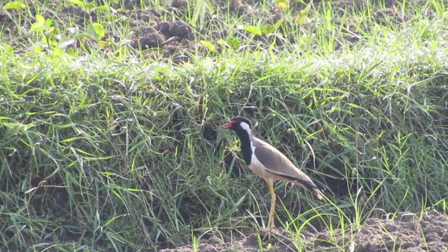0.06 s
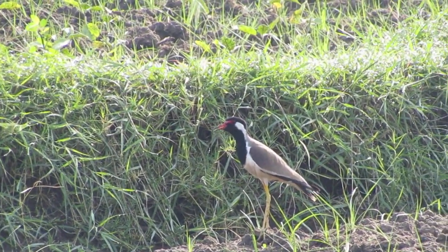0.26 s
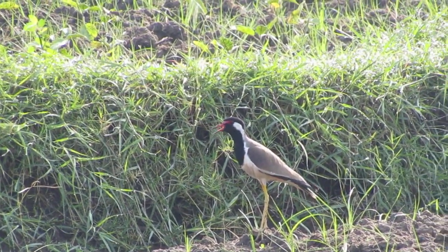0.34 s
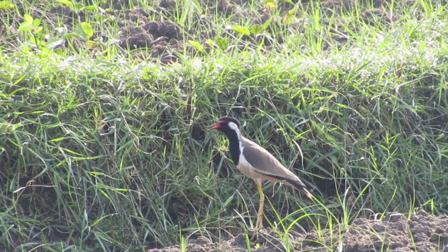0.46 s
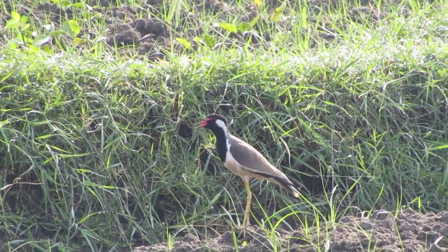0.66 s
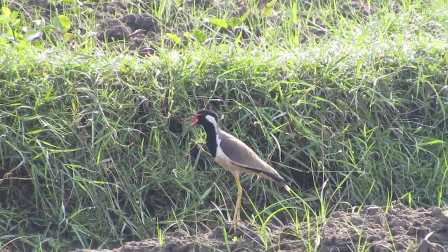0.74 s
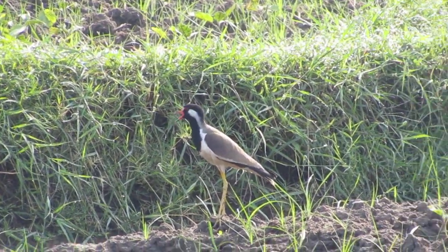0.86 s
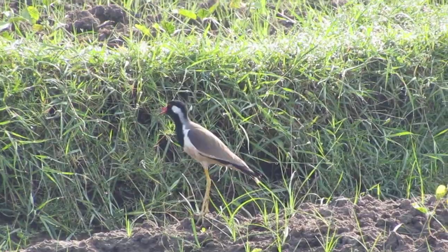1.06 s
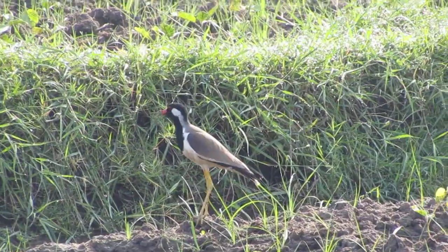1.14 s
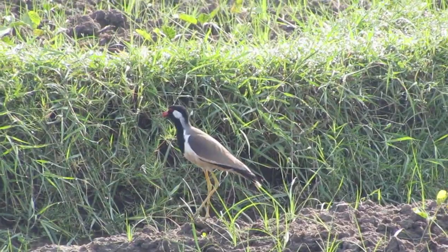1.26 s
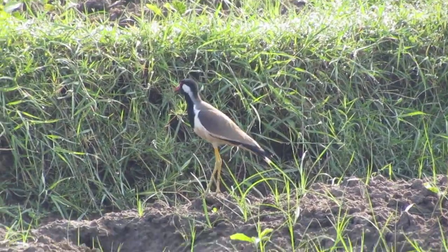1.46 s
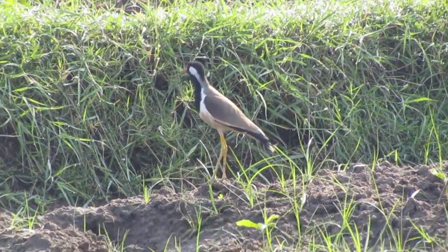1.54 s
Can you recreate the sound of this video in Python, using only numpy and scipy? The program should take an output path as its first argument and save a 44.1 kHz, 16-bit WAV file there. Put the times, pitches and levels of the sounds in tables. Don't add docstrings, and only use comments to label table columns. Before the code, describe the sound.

A lapwing calls sharply a few metres away over steady soft field hiss, low rumble and distant twittering. Bright, nasal notes come at 0.34 and 0.5 seconds, a stutter at 0.73, four quick bursts at 0.85, and a longer falling stutter from 0.99 to 1.11. A farther wader answers immediately, low then high. Twitter continues; near 1.58 grass rustles faintly and another bird pipes. Short outdoor echoes.

```python
import sys
import numpy as np
from scipy import signal
from scipy.fft import rfft, irfft
from scipy.io import wavfile

SR = 44100
rng = np.random.default_rng(int(sys.argv[2]) if len(sys.argv) > 2 else 0)


def ratio_of_db(decibels):
    return 10 ** (np.asarray(decibels, float) / 20)


def persist_wave(psi):
    counts = np.round(np.clip(psi, -1, 1) * 32767).astype(np.int16)
    wavfile.write(sys.argv[1], SR, np.atleast_2d(counts).T)


N = 70560


def at_hz(points, hz):
    table_hz, table_db = np.transpose(points)
    return np.interp(np.log(hz), np.log(table_hz), table_db)


def rms_one(x):
    return x / np.sqrt(np.mean(x ** 2) + 1e-20)


def band(hz, width_hz):
    sos = signal.butter(2, [hz - width_hz / 2, hz + width_hz / 2], "band", fs=SR, output="sos")
    settled = signal.sosfilt(sos, rng.standard_normal(N + SR))[SR:]
    return rms_one(settled)


def gate(start, length, attack, release):
    t = np.arange(N) / SR
    ramp = np.minimum((t - start) / attack, (start + length - t) / release)
    return np.sin(np.pi / 2 * np.clip(ramp, 0, 1)) ** 2


def arch(start, length, first_hz, mid_hz, last_hz):
    u = np.clip((np.arange(N) / SR - start) / length, 0, 1)
    return first_hz * (1 - u) * (1 - 2 * u) + mid_hz * 4 * u * (1 - u) + last_hz * u * (2 * u - 1)


def stack(f0, throat, tilt_db, count, top_db=0, low_db=0):
    phase = 2 * np.pi * np.cumsum(f0) / SR
    out, power = 0, 0
    for k in range(1, count + 1):
        beak_db = tilt_db * np.log2(np.clip(k, 2, 5) / 2)
        gain = ratio_of_db(at_hz(throat, k * f0) + beak_db + top_db * (k > 6) + low_db * (k < 4))
        lag = 0.33 * np.clip(k - 2, 0, 4) ** 2
        out = out + gain * np.sin(k * phase - lag)
        power = power + gain ** 2 / 2
    return out / np.sqrt(power)


def lapwing():
    # start_s, length_s, level_db, swell_db (to the end), beak_db_per_octave
    bursts = [(.3415, .0305, -29, 1.5, -1), (.3695, .0135, -37, -5, -12), (.4982, .0235, -30.5, 1, 1.5),
              (.520, .008, -42, -3, -9), (.7265, .008, -34, -1.5, .5), (.740, .022, -32.5, .5, 1),
              (.7595, .009, -38, -3, -4), (.8517, .0105, -32, -2.5, 2), (.8655, .0115, -30, -1, 2.5),
              (.8802, .015, -30.5, -3, 2.5), (.8935, .0215, -31, 1, 1.5), (.992, .008, -35.5, -2, -1.5),
              (1.0042, .011, -33.5, -1.5, -1.5), (1.0182, .012, -33.5, -2, -2.5),
              (1.0315, .012, -34.5, -1.5, -2.5), (1.0452, .014, -35.5, -2, -4.5),
              (1.0578, .033, -37, .5, -17), (1.0885, .024, -41.5, -5, -26)]
    # time_s, pitch_hz
    calls = [
        [(.341, 1245), (.352, 1278), (.360, 1268), (.366, 1258), (.370, 1225), (.375, 1140), (.383, 1150)],
        [(.498, 1205), (.507, 1235), (.517, 1228), (.526, 1160)],
        [(.726, 1165), (.734, 1160), (.740, 1205), (.746, 1208), (.758, 1182), (.768, 1110)],
        [(.852, 1190), (.870, 1215), (.890, 1228), (.906, 1240), (.915, 1215)],
        [(.992, 1215), (1.008, 1248), (1.024, 1248), (1.050, 1222), (1.064, 1192), (1.084, 1165), (1.097, 1125),
         (1.101, 1050), (1.111, 1015)],
    ]
    # frequency_hz, level_db
    throat = [(1250, -24), (2500, -4), (3750, -4), (5000, 1.5), (6250, -4.5), (7500, -13.5), (10000, -29),
              (12000, -24), (15000, -34)]
    attack_s, release_s = .0015, .003
    scoop_hz, scoop_s = 25, .002
    droop_hz, droop_s = 90, .002
    opening_db, thinning_db = 7, -6
    edge_rasp_db, rasp_db = -8, -20.5

    t, out = np.arange(N) / SR, 0
    line = np.interp(t, *np.transpose(sum(calls, [])))
    line = line * (1 + .0035 * band(260, 490))
    flap = ratio_of_db(edge_rasp_db) * band(570, 780)
    for start, length, db, swell_db, tilt_db in bursts:
        u = np.clip((t - start) / length, 0, 1)
        opened = gate(start, length, attack_s, release_s)
        bright = tilt_db > -8
        scoop = scoop_hz * np.exp(-u * length / scoop_s)
        droop = droop_hz * bright * np.exp(-(1 - u) * length / droop_s)
        voice = stack(line - scoop - droop, throat, tilt_db, count=12,
                      top_db=opening_db * (u - .5), low_db=thinning_db * (u - .5) * bright)
        level = ratio_of_db(db + swell_db * (2 * u - 0.5))
        out = out + level * opened * (1 + flap * (1 - opened)) * voice
    return out * (1 + ratio_of_db(rasp_db) * band(590, 1170))


def far_waders():
    # start_s, length_s, level_db, first_hz, mid_hz, last_hz
    registers = [
        [(1.109, 0.0394, -48.5, 682, 690, 720), (1.148, 0.0147, -42.5, 962, 1000, 1030)],
        [(1.165, 0.0178, -41.5, 1490, 1520, 1656), (1.179, .017, -39.5, 1630, 1650, 1590)],
        [(1.591, 0.014, -45.5, 1310, 1350, 1320)],
    ]
    # frequency_hz, level_db
    throats = [
        [(1000, -18), (2000, 0.5), (2800, -2), (3400, -18), (4000, -13), (6000, -25)],
        [(1600, -10), (3100, -3.5), (4500, -11), (4950, 0.5), (6100, -33), (6600, -11.5), (7500, -34)],
        [(1300, -23), (2700, -20), (4000, -11), (5300, -17), (7000, -23), (9000, -31)],
    ]
    out = 0
    for notes, throat in zip(registers, throats):
        for start, length, db, *hz in notes:
            voice = stack(arch(start, length, *hz), throat, 0, count=8)
            out = out + ratio_of_db(db) * gate(start, length, 0.001, 0.0018) * voice
    return out


def whistlers():
    # start_s, length_s, level_db, first_hz, mid_hz, last_hz
    whistles = [(.2195, .003, -51, 3500, 2900, 2300), (.227, .023, -43, 2900, 3170, 2980),
                (.249, .013, -49, 3350, 3600, 3700), (.261, .019, -56, 3620, 3550, 3560),
                (.282, .05, -63, 3560, 3520, 3500), (.285, .006, -56, 3000, 2900, 2800),
                (.283, .034, -51, 900, 940, 945), (1.184, .036, -51, 900, 960, 950),
                (.580, .146, -56, 3380, 3590, 3420), (1.156, .012, -51, 2500, 2750, 2900),
                (1.188, .011, -50, 3250, 3050, 2950), (1.298, .016, -58, 5300, 4100, 3600),
                (1.226, .014, -61, 3300, 3600, 4000), (1.535, .018, -62, 4400, 3800, 3650),
                (1.553, .022, -59, 3750, 3900, 3900), (1.574, .012, -61, 3300, 3800, 4100),
                (.47, .07, -62, 1490, 1500, 1490), (1.160, .010, -48, 2250, 2000, 1750),
                (1.140, .013, -50, 2050, 2150, 2250), (-.02, .058, -59, 3280, 3200, 3020),
                (-.02, .05, -56, 1690, 1670, 1600)]
    waver = 1 + 0.018 * band(148, 249)
    throb = np.abs(1 + .45 * band(170, 170))
    flutter = ratio_of_db(1.5 * band(40, 50))
    out = 0
    for start, length, db, *hz in whistles:
        short = length < .03
        edge_s = min(0.1 * length, .012)
        pitch = arch(start, length, *hz) * (waver if short else 1)
        tone = np.sin(2 * np.pi * np.cumsum(pitch) / SR)
        unsteady = throb if short else flutter * throb ** .5
        out = out + ratio_of_db(db + 1.5) * gate(start, length, edge_s, edge_s) * tone * unsteady
    return out


def flock():
    # time_s, level_db, centre_hz
    twitter = [(0, -61.5, 5470), (.07, -54.5, 5706), (.15, -65, 6270), (.25, -54, 5720), (.32, -57, 6440),
               (.45, -55, 6000), (.62, -53, 5740), (.72, -62, 5700), (.82, -65, 5600), (.96, -54.5, 6310),
               (1.12, -58.5, 5860), (1.26, -52.5, 5770), (1.34, -60.5, 6070), (1.43, -54.5, 5740),
               (1.49, -63.5, 5900), (1.529, -57, 6480), (1.6, -48.5, 5620)]
    chirps_per_s, chirp_s = 130, .013
    fall_hz, spread_hz = 750, 300
    s, db, hz = np.transpose(twitter)
    out, draws = np.zeros(N + SR), rng.standard_normal((300, 3))
    t = np.arange(int(chirp_s * SR)) / SR
    for k, (late, off, loud) in enumerate(draws):
        start = (k + 0.24 * late) / chirps_per_s
        if 0 < start < N / SR:
            f = np.interp(start, s, hz) + spread_hz * off + fall_hz * (.5 - t / chirp_s)
            chirp = np.hanning(len(t)) * np.sin(2 * np.pi * np.cumsum(f) / SR)
            i = int(start * SR)
            out[i:i + len(t)] += ratio_of_db(np.interp(start, s, db) + 1.85 * loud) * chirp
    haze = ratio_of_db(-7 + np.interp(np.arange(N) / SR, s, db)) * band(6000, 1100)
    return ratio_of_db(-3) * out[:N] + haze


def echoes(x):
    # start_s, t60_s, level_db, echoes_per_s
    scatter = [
        (.003, .11, -8, 2500),
        (.02, .4, -19, 2000),
    ]
    # delay_s, level_db
    walls = [(.0042, -17), (.0115, -17), (.021, -15)]
    # frequency_hz, level_db
    echo_colour = [(1000, -5), (2500, -2.5), (5000, -1.5), (7000, 0.5), (9000, 10), (15000, 5)]
    t, response = np.arange(SR // 2) / SR, 0
    for start, t60, db, rate in scatter:
        struck = rng.standard_normal(len(t)) * (rng.random(len(t)) < rate / SR)
        hits = struck * (t > start) * 10 ** (-3 * t / t60)
        response = response + ratio_of_db(db) * hits / np.sqrt(np.sum(hits ** 2))
    for delay, db in walls:
        response[int(delay * SR)] += ratio_of_db(db)
    hz = np.maximum(np.arange(N + 1) * SR / (2 * N), 5)
    colour = ratio_of_db(at_hz(echo_colour, hz))
    return irfft(rfft(x, 2 * N) * rfft(response, 2 * N) * colour)[:N]


def fields():
    # frequency_hz, level_db
    air_colour = [(18, -14), (50, 2.5), (160, -2.5), (600, -6), (1500, -10), (2300, -14.5), (4200, -19),
                  (15500, -29.5)]
    # frequency_hz, width_hz, level_db
    hums = [(59.4, 4.3, -60), (597, 27.4, -65), (646.3, 17.6, -68), (756.3, 5.1, -68.5),
            (302.6, 6.3, -69.5)]
    # time_s, half_width_s, level_db, centre_hz, width_hz
    grass = (1.574, .007, -62, 10200, 2200)
    t = np.arange(N) / SR
    hz = np.maximum(np.arange(N // 2 + 1) * SR / N, 5)
    hiss = irfft(rfft(rng.standard_normal(N)) * ratio_of_db(at_hz(air_colour, hz)), N)
    air = ratio_of_db(-52.5) * rms_one(hiss)
    s, half, db, centre_hz, width_hz = grass
    rustle = ratio_of_db(db) * np.exp(-((t - s) / half) ** 2) * band(centre_hz, width_hz)
    whine = ratio_of_db(-76.5) * np.sin(2 * np.pi * 11793 * t)
    hum = sum(ratio_of_db(db) * band(f, width) for f, width, db in hums)
    return air + rustle + whine + hum


def scene():
    near = lapwing()
    far = far_waders() + whistlers() + flock()
    return (near + far + echoes(near + ratio_of_db(-3) * far) + fields())[None]


def top_cut(x):
    return signal.sosfilt(signal.butter(12, 15750, fs=SR, output="sos"), x)


def record(dry):
    mix = signal.sosfilt(signal.cheby2(12, 45, 15300, fs=SR, output="sos"), dry)
    return top_cut(mix)


dry = scene()
out = record(dry)
persist_wave(out)
```